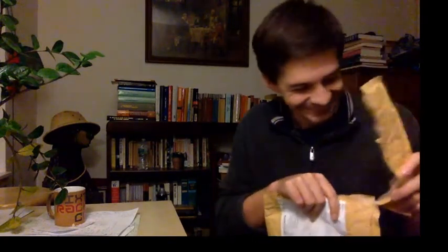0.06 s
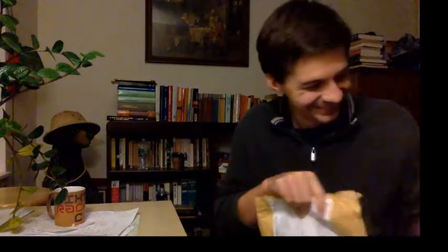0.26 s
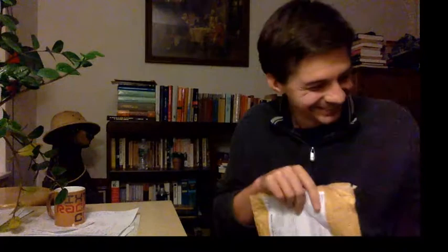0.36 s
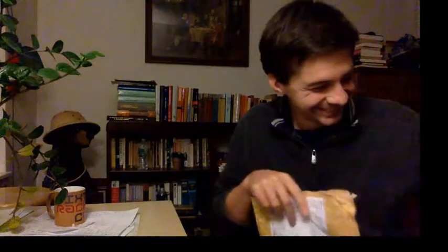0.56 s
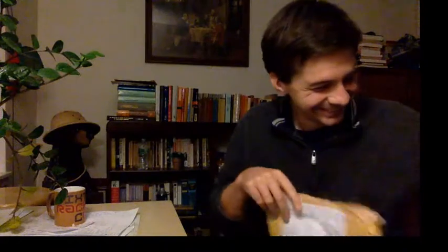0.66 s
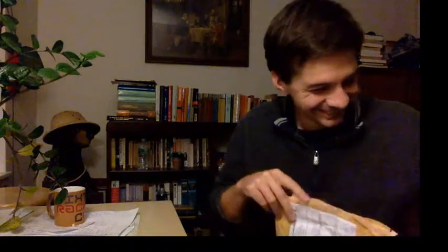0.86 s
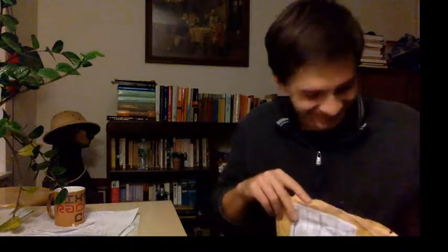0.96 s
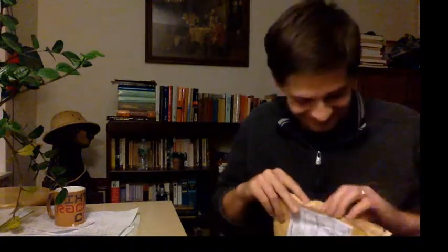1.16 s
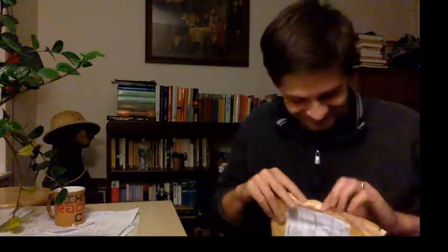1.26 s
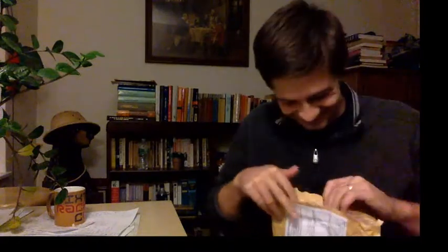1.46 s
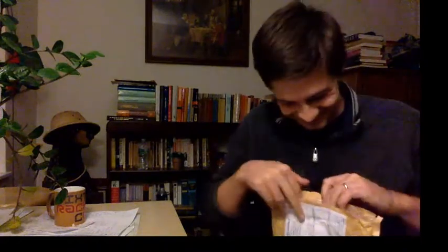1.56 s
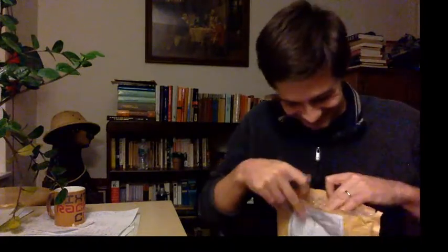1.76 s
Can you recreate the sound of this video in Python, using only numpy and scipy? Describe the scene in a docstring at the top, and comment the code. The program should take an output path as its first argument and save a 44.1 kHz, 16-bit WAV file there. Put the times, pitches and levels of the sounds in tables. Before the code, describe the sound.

A padded paper envelope is ripped sharply, then crinkles and ticks lightly in a quiet room

```python
"""A padded paper mailer is torn and crumpled by hand at a table in a quiet room, near a small microphone.
Its creases snap and its thin lining ticks high, both as slips that ring damped modes; the hollow pouch
thumps low as two decaying partials; a strip rips off in bursts of filtered noise.
Between them countless tiny folds rustle as short grains while the hands move. The room answers briefly
through decaying sparse taps, over a low rumble of the table and a quiet hush of shaped noise."""
import sys
import numpy as np
from scipy import signal
from scipy.fft import rfft, irfft
from scipy.io import wavfile
from scipy.ndimage import uniform_filter1d

SR = 44100
rng = np.random.default_rng(int(sys.argv[2]) if len(sys.argv) > 2 else 0)


def ratio(d):
    """dB to gain"""
    e = np.asarray(d, float) / 20
    return 10 ** e


def transcribe(signal):
    """Save signal, clipped to [-1, 1], as a 16-bit WAV file at the path in sys.argv[1]."""
    frames = np.atleast_2d(signal).T
    limited = np.clip(frames, -1, 1)
    pcm = np.round(limited * 32767).astype(np.int16)
    wavfile.write(sys.argv[1], SR, pcm)


N = 79380  # samples, 1.8 s


def read(points, hz):
    """Frequency response by interpolation: straight lines between points on a logarithmic axis."""
    f, value = np.transpose(points)
    return np.interp(np.log(hz + 1), np.log(f + 1), value)


def level_over_time(times_s, level_db):
    """Amplitude envelope: a level in dB, linear between its times, turned into a gain."""
    return ratio(np.interp(np.arange(N) / SR, times_s, level_db))


def evened(x):
    """Normalisation of signal power: scales to rms 1."""
    return x / np.sqrt(np.mean(x ** 2) + 1e-20)


def add(mix, start_s, sound):
    """Superposition: adds a sound into the mix at its start time."""
    part = mix[round(start_s * SR):][:len(sound)]
    part += sound[:len(part)]


def band(x, lo_hz, hi_hz, order):
    """Band-pass filtering: keeps the energy between two frequencies."""
    sections = signal.butter(order, (lo_hz, hi_hz), "band", fs=SR, output="sos")
    return signal.sosfilt(sections, x)


def colour(x, points):
    """Spectral shaping: flattens the smoothed spectrum, then imposes that of a table, at rms 1."""
    spectrum, hz = rfft(x), np.fft.rfftfreq(len(x), 1 / SR)
    flat = spectrum / np.sqrt(uniform_filter1d(abs(spectrum) ** 2, size=1500) + 1e-12)
    return evened(irfft(flat * ratio(read(points, hz)), len(x)))


def wander(samples):
    """Slow random modulation: noise smoothed by two moving averages, at rms 1."""
    once = uniform_filter1d(rng.standard_normal(N), size=samples)
    return evened(uniform_filter1d(once, size=samples))


def folds(lo_hz, hi_hz, cycles, clump_db):
    """Granular shot noise: each tiny fold is a short damped grain, and grains arrive at random in clumps."""
    folds_per_s, pitches = 14000, 24  # the rate is shared among all pitches
    patch_db, scatter_db = 3.5, 3.0  # rms of the slow change at each pitch; scale of the size scatter
    out = np.zeros(N)
    clump = ratio(clump_db * wander(200))
    t = np.arange(1500) / SR
    for hz in np.geomspace(lo_hz, hi_hz, num=pitches):
        patch = ratio(patch_db * wander(900))  # each pitch of fold comes and goes
        grain = np.sin(2 * np.pi * hz * t) * (t * hz) * np.exp(-t * hz * 2 / cycles)
        arrives = rng.random(N) < folds_per_s / pitches / SR
        size = ratio(scatter_db * np.minimum(rng.exponential(1, N), 5)) * arrives
        impulses = size * rng.choice([-1., 1.], N) * patch
        out += signal.oaconvolve(impulses, grain / np.linalg.norm(grain))[:N]
    return out * clump


def rustle():
    """Superposed random folding: the paper body fills the middle range, the lining the treble."""
    # rustle while the hands move: time_s, paper_db, treble_db (rms levels)
    motion = [(0, -49, -37), (0.022, -44, -54.5), (0.047, -58, -59.5), (0.07, -64, -76), (0.11, -74, -76),
              (0.127, -72, -63), (0.133, -58, -48.5), (0.16, -47, -42), (0.177, -39.5, -36.5),
              (0.181, -34.5, -38.5), (0.192, -25, -34.5), (0.196, -39, -38), (0.225, -43, -41.5),
              (0.26, -50.5, -59.5), (0.29, -60, -66), (0.309, -57.5, -62), (0.318, -55.5, -56.5),
              (0.36, -53, -47), (0.39, -58.5, -51), (0.418, -49.5, -95), (0.449, -74, -58.5),
              (0.47, -63, -63.5), (0.499, -66, -64), (0.514, -57, -72), (0.545, -61, -60.5),
              (0.58, -58.5, -58), (0.615, -57.5, -56), (0.635, -63.5, -57), (0.658, -62, -62),
              (0.668, -48.5, -46.5), (0.7, -52.5, -47.5), (0.745, -61.5, -57.5), (0.765, -62.5, -69),
              (0.8, -71.5, -79), (0.86, -67.5, -66), (0.91, -88, -90), (0.925, -70, -67), (0.96, -80, -109),
              (1.0, -72, -79), (1.061, -74.5, -61.5), (1.075, -85, -83), (1.115, -94, -99),
              (1.127, -61, -52.5), (1.157, -58, -54.5), (1.174, -81, -62.5), (1.188, -56, -52),
              (1.233, -56, -62.5), (1.259, -72, -64), (1.274, -61, -54), (1.295, -74, -61),
              (1.32, -75.5, -86), (1.339, -52.5, -61), (1.382, -56.5, -50.5), (1.412, -43.5, -42),
              (1.44, -48, -45), (1.47, -53, -44.5), (1.496, -55, -72), (1.513, -69, -64),
              (1.544, -70.5, -80), (1.575, -62, -60), (1.62, -69, -53), (1.641, -56.5, -48.5),
              (1.676, -51, -45.5), (1.71, -63, -59), (1.734, -54, -50.5), (1.76, -67.5, -68.5),
              (1.775, -79, -74), (1.8, -69, -76)]
    # spectrum of the paper body's folds: frequency_hz, level_db
    paper_spectrum = [(150, -21), (330, -7), (700, -17.5), (1200, 1.5), (3000, -1), (5000, 1.5),
                      (7000, -4.5), (9000, -31.5)]
    # spectrum of the lining's folds: frequency_hz, level_db
    lining_spectrum = [(3820, -29), (6500, -17), (8060, -7.5), (10200, -2.5), (14600, -1), (15700, -5),
                       (16300, -9)]
    time_s, paper_db, treble_db = np.transpose(motion)
    paper = colour(folds(200, 7365, cycles=5.04, clump_db=1.5), paper_spectrum)
    lining = colour(folds(6500, 15800, cycles=17.0, clump_db=1.4), lining_spectrum)
    return paper * level_over_time(time_s, paper_db) + lining * level_over_time(time_s, treble_db)


def rumble():
    """Structure-borne low noise: its level follows how hard the hands lean on the table."""
    # low rumble through the table: time_s, level_db (rms)
    leaning = [(0.0, -82), (0.124, -79), (0.194, -89), (0.26, -81), (0.646, -79), (0.732, -69),
               (0.786, -79), (0.862, -84), (0.952, -87.5), (1.484, -80), (1.514, -89.5), (1.8, -76)]
    low = band(rng.standard_normal(N), 70, 170, order=2)
    return evened(low) * level_over_time(*np.transpose(leaning))


def hush():
    """Stationary background noise: random noise with the steady spectrum of the quiet room."""
    # spectrum of the hush: frequency_hz, level_db
    hush_spectrum = [(40, -17.5), (120, 0.5), (320, -2), (1500, -5), (4200, 2.5), (7500, -7.5),
                     (14400, -5.5)]
    return ratio(-70.5) * colour(rng.standard_normal(N), hush_spectrum)  # rms dB


def buckle(level_db, hz, reach, slip_s, crack_db, soft):
    """Stick-slip excitation of damped modes: a few quick slips ring the crease's own pitch
    and the sheet modes near it, together with a short noise crack."""
    # modes of the folded mailer: frequency_hz, level_db, t60_s (at softness 1)
    sheet = [(1150, -3.5, 0.021), (1334, -7, 0.02), (1640, 11, 0.0083), (2316, 1.5, 0.0094),
             (2903, 2.5, .011), (3400, -2.5, 0.0094), (4250, 2, 0.014), (4940, -8, 0.019), (5900, -5, 0.02),
             (6850, 0, 0.0082), (7710, -1, 0.008), (8900, -9, 0.011), (10200, -7, 0.0021),
             (11700, -2, 0.004), (12150, -8, 0.0067), (14300, -9.5, .006), (15900, -1.5, 0.0091)]
    own_db, slip_count = 4.5, 4
    t = np.arange(900) / SR
    slip_s = np.clip(slip_s * soft, .0003, .01)
    reach = np.clip(reach, .1, 1.5)  # octaves

    mode_hz, mode_db, mode_t60 = np.transpose(sheet)
    octaves = np.log2(mode_hz / hz)
    spread = np.where(mode_hz < hz, .7 * reach, reach)  # modes below the pitch fall off faster
    gain = np.r_[ratio(mode_db) * np.exp(-.5 * (octaves / spread) ** 2), ratio(own_db)]
    sign = np.where(rng.random(len(gain)) < .3 * soft, -1, 1)
    f = np.r_[mode_hz, hz][:, None]
    t60 = np.r_[mode_t60, .6 * np.interp(hz, mode_hz, mode_t60)][:, None]
    decay = ratio(-60 * t / (t60 * np.clip(soft, .25, 2)))
    onset = 1 - np.exp(-t * f * 0.47)
    ring = (sign * gain) @ (np.sin(2 * np.pi * f * t) * decay * onset)

    when, size = rng.random((slip_count, 2)).T
    slips = np.zeros(900)
    at = (np.r_[0, when[1:]] * slip_s * SR).astype(int)
    np.add.at(slips, at, np.r_[1, .55 * size[1:]])  # the first slip is the strongest
    ring = np.convolve(slips, ring)[:900]

    crack = band(rng.standard_normal(900), hz / 2 ** reach, min(hz * 2 ** (2 * reach), 16000), order=3)
    u = t / (0.51 * slip_s)
    crack = evened(crack) * u * np.exp(1 - u)  # envelope peaks at u = 1
    return ratio(level_db) * (ring / abs(ring).max() + ratio(crack_db) * crack)


def snaps():
    """Buckling instability: creases give way suddenly, softer ones with longer slips and ring."""
    # creases that buckle: start_s, level_db (peak of the ring), pitch_hz,
    # reach (octaves over the modes), softness (stretch of ring and slips)
    crease_events = [(0.039, -42.5, 1260, 0.33, 0.91), (0.1328, -45, 4000, .7, 0.48),
                     (0.144, -33, 1960, 0.45, 0.75), (0.1904, -13.5, 1510, 1.2, 0.41),
                     (0.2167, -24, 2000, .9, 0.67), (0.3148, -41, 2560, 0.47, 0.9),
                     (0.3288, -38, 3260, .7, 0.74), (0.3436, -35, 3400, .7, 0.95),
                     (0.3792, -28.5, 2650, 0.65, 0.74), (0.4053, -21.5, 4430, 0.66, 0.34),
                     (.4325, -48, 6200, 0.35, .6), (0.444, -46, 5900, .4, .75),
                     (0.5088, -34, 2700, 0.67, 0.77), (0.6286, -49, 2390, .5, .75),
                     (0.666, -33.5, 3180, 0.97, .92), (0.669, -41.5, 1580, .9, 0.92),
                     (.681, -35.5, 1400, 0.79, 0.87), (0.8084, -49.5, 6080, 0.92, 0.64),
                     (.844, -53.5, 970, 0.32, 0.89), (0.9164, -28.5, 3400, 1, 1.14),
                     (0.9751, -49, 4260, .8, .6), (.991, -60, 4270, 0.84, .69),
                     (1.1237, -52.5, 2764, 1.1, 0.73), (1.141, -46.5, 1150, 1.3, 1.02),
                     (1.186, -43, 5370, 0.48, 0.55), (1.198, -37.5, 2870, 0.77, 0.65),
                     (1.273, -49.5, 3500, .83, 0.71), (1.3392, -40.5, 2380, 1.6, 0.77),
                     (1.354, -44, 4200, 1.4, .75), (1.3943, -38.5, 3100, 0.96, 0.75),
                     (1.415, -28, 3040, 1.4, 0.81), (1.426, -35, 4250, 0.84, .5),
                     (1.4465, -23.5, 5180, 0.86, 0.52), (1.4585, -44, 1290, 0.63, .74),
                     (1.4853, -41, 1180, 0.76, 1.1), (1.6068, -45, 5900, 0.38, 0.74),
                     (1.6484, -32.5, 1640, 1.23, 0.93), (1.6802, -33.5, 1520, 0.66, 0.83),
                     (1.6914, -34, 1480, 0.65, 0.93), (1.728, -43, 1320, 0.43, 0.82),
                     (1.7408, -45.5, 1230, 0.24, 0.67), (1.7551, -44.5, 1530, 0.52, 0.85)]
    out = np.zeros(N)
    for start_s, level_db, hz, reach, soft in crease_events:
        add(out, start_s, buckle(level_db, hz, reach, slip_s=0.0023, crack_db=-16, soft=soft))
    return out


def room(x):
    """Reverberation: sparse taps of random sign, each band decaying at its own rate; three tails take turns."""
    # reverberation times: frequency_hz, t60_s
    reverberation = [(250, 0.16), (1200, 0.15), (4000, 0.16), (9000, 0.14), (15000, 0.14)]
    out = np.zeros(N)
    turn = np.arange(N) / SR * 11
    for k in range(3):
        taps = np.zeros(SR // 2)
        at = np.arange(200, SR // 2 - 12, 12)  # one tap in every 12 samples
        taps[at + rng.integers(0, 12, len(at))] = rng.choice([-1., 1.], len(at))
        hz, t, z = signal.stft(taps, SR, nperseg=256)
        decay = ratio(-60 * t / np.maximum(read(reverberation, hz), .02)[:, None])
        tail = signal.istft(z * decay, SR, nperseg=256)[1]
        share = np.sqrt(2 / 3) * np.cos(np.pi * (turn + k / 3))  # squares sum to 1 over the tails
        out += signal.fftconvolve(x * share, tail / np.linalg.norm(tail))[:N]
    return out


def thumps():
    """Low resonance of a hollow body: two inharmonic partials swell quickly and die exponentially."""
    # the hollow pouch thumping: start_s, level_db (peak of the main partial's envelope), pitch_hz
    pouch_events = [(0.045, -48, 339), (0.164, -44.5, 440), (0.178, -35.5, 360), (0.186, -32, 399),
                    (0.328, -61, 595), (0.47, -62.5, 316), (0.506, -59.5, 382), (0.661, -77, 646),
                    (0.713, -56.5, 342), (0.775, -56.5, 474), (0.841, -58.5, 317), (0.987, -63.5, 620),
                    (1.137, -66.5, 386), (1.191, -59.5, 328), (1.337, -80, 301), (1.41, -56, 370),
                    (1.456, -50, 368), (1.487, -43, 349), (1.637, -57, 340)]
    rise_s, t60_s = 0.0011, 0.027
    out = np.zeros(N)
    t = np.arange(4000) / SR
    swing = (1 - np.exp(-t / rise_s)) ** 2 * ratio(-60 * t / t60_s)
    for start_s, level_db, hz in pouch_events:
        main = np.sin(2 * np.pi * (hz * t + rng.random()))
        upper = np.sin(2 * np.pi * (1.663 * hz * t + rng.random()))
        tone = main + ratio(-5.5 - 60 * t / 0.025) * upper  # the upper partial decays faster
        add(out, start_s, ratio(level_db) * swing / swing.max() * tone)
    return out


def ticks():
    """Buckling of a thin film: the lining slips and rings as the creases do, mostly at high pitches."""
    # the thin lining ticking: start_s, level_db (peak of the ring), pitch_hz (before the ceiling),
    # reach (octaves over the modes)
    lining_events = [(0.1311, -33, 14650, 0.55), (0.1506, -26, 10500, 0.45), (0.2912, -51.5, 11000, 0.38),
                     (0.3137, -28.5, 11700, 0.48), (0.3421, -26, 11700, 0.8), (0.3775, -27, 12590, 0.296),
                     (0.4319, -37, 7000, 0.54), (0.5467, -56, 10800, 0.27), (0.621, -36.5, 14830, 0.2),
                     (0.6644, -28.5, 13100, 0.25), (0.6804, -32, 13400, 0.24), (0.6934, -38, 11500, 0.24),
                     (0.7224, -40.5, 13750, 0.3), (0.7761, -46, 14300, 0.9), (0.8091, -60, 8720, 0.3),
                     (0.9158, -43.5, 8900, 0.44), (1.0614, -59, 10000, 0.35), (1.1233, -41.5, 11100, 0.11),
                     (1.1812, -38.5, 9850, 0.13), (1.2286, -42, 15300, 0.42), (1.269, -45, 9680, 0.48),
                     (1.3354, -56, 16670, 0.24), (1.3623, -39.5, 9600, 0.3), (1.3708, -35.5, 13870, 0.63),
                     (1.4047, -46, 14400, 0.47), (1.4154, -41, 14700, 0.25), (1.4456, -29, 10200, 0.35),
                     (1.486, -38.5, 12400, 0.64), (1.5698, -54.5, 8600, 0.36), (1.5888, -41, 8730, 0.61),
                     (1.6347, -36, 12320, 0.39), (1.6656, -32, 14300, 0.36), (1.7275, -37, 15870, 0.38)]
    ceiling_hz = 15500
    out = np.zeros(N)
    for start_s, level_db, hz, reach in lining_events:
        tick = buckle(level_db, min(hz, ceiling_hz), reach, slip_s=.003, crack_db=-11, soft=1)
        add(out, start_s, tick)
    return out


def rip():
    """Fracture noise: the strip rips off, its fibres parting in bursts of uneven noise in several bands."""
    # bursts of parting fibres: start_s, length_s, level_db (rms before the envelope), centre_hz, width_hz
    fibre_bursts = [(.1795, .009, -20, 13760, 2070), (.179, 0.016, -25.5, 11140, 5800),
                    (.179, .014, -26.5, 4150, 3500), (.185, .008, -27, 1570, 400)]
    out = np.zeros(N)
    for start_s, length_s, level_db, hz, width in fibre_bursts:
        fibres = rng.standard_normal(2000) * rng.exponential(1, 2000)
        burst = band(fibres, hz - width / 2, min(hz + width / 2, 16000), order=2)
        u = np.arange(0, 1, 1 / (length_s * SR))
        envelope = np.sin(np.pi * u ** 0.88) ** 0.87
        add(out, start_s, ratio(level_db) * evened(burst[-len(u):]) * envelope)
    return out


def scene():
    """Linear superposition: the mailer's events and their reverberation, rustle, rumble and hush."""
    events = snaps() + thumps() + ticks() + rip()
    reverberant = ratio(-9) * room(events)
    return (events + reverberant + rustle() + rumble() + hush())[None]


def low_pass(x):
    """Removes everything above the highest recorded frequency."""
    return signal.sosfilt(signal.butter(12, 16470, fs=SR, output="sos"), x)


def record(dry):
    """Linear filtering: the small microphone in its housing colours everything with a minimum-phase response."""
    # response of the microphone: frequency_hz, level_db
    mic_response = [(40, -36.5), (110, -5), (400, 1), (650, 2), (900, -0.5), (1080, 4), (1650, -1),
                    (1900, -4), (2500, 0.5), (4300, -2), (7000, -4), (11000, -2), (13800, -2.5),
                    (15600, 1.5), (16000, -30.5)]
    hz = np.linspace(0, SR / 2, num=1025)
    # doubled in dB because the minimum-phase conversion halves it
    doubled = signal.firwin2(2047, hz, ratio(2 * read(mic_response, hz)) + 1e-5, fs=SR)
    mic = signal.minimum_phase(doubled)
    mix = signal.oaconvolve(dry, mic[None])[:, :N]
    return low_pass(mix)


dry = scene()
out = record(dry)
transcribe(out)
```